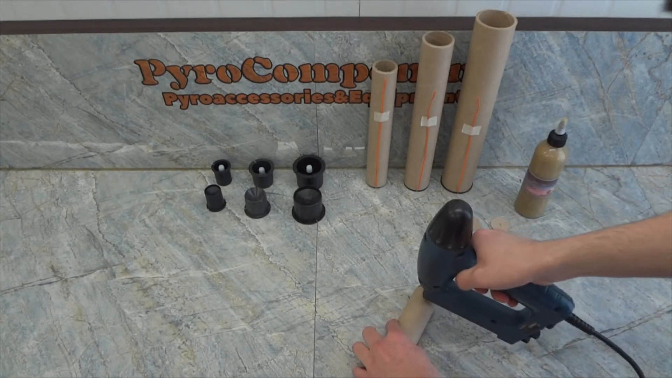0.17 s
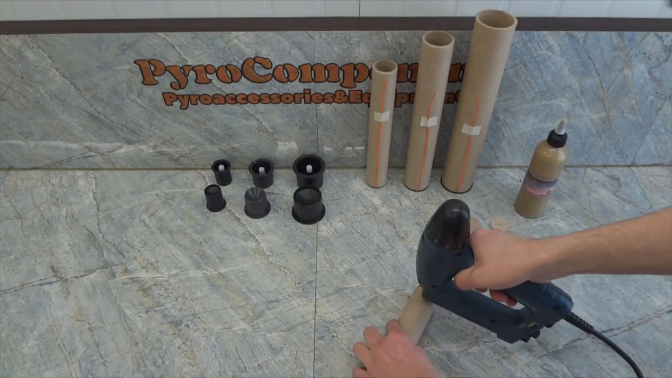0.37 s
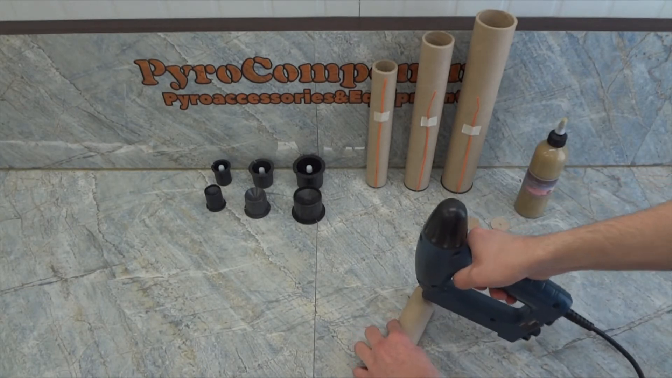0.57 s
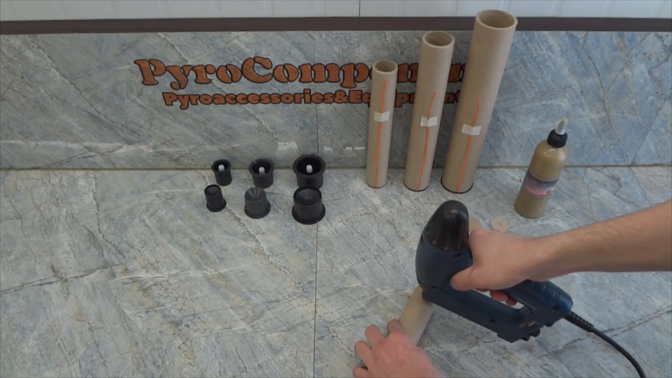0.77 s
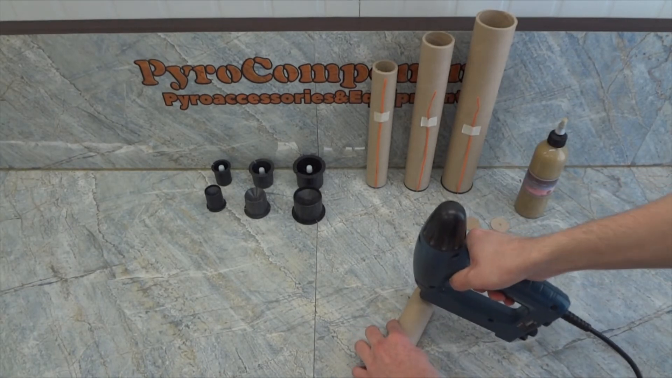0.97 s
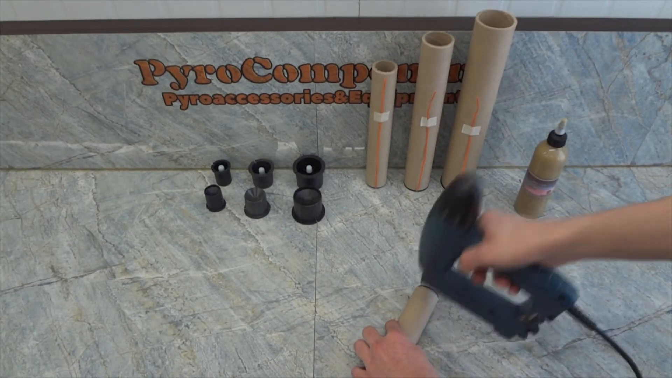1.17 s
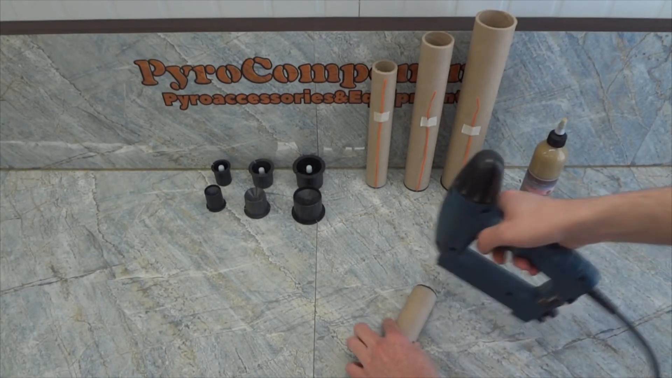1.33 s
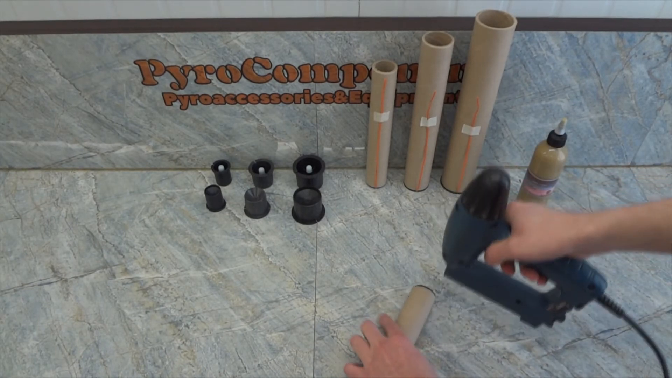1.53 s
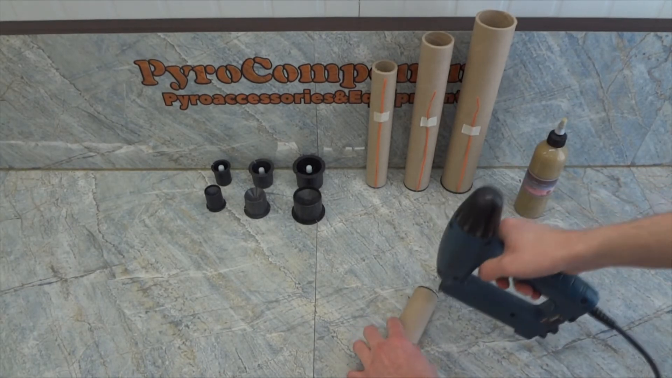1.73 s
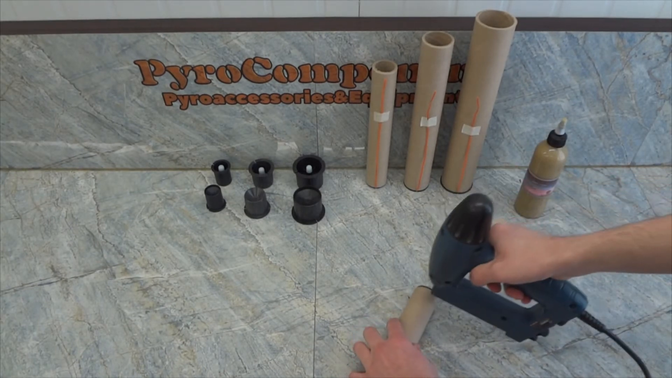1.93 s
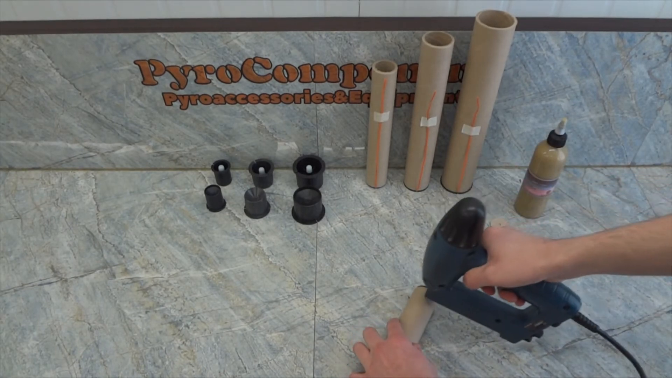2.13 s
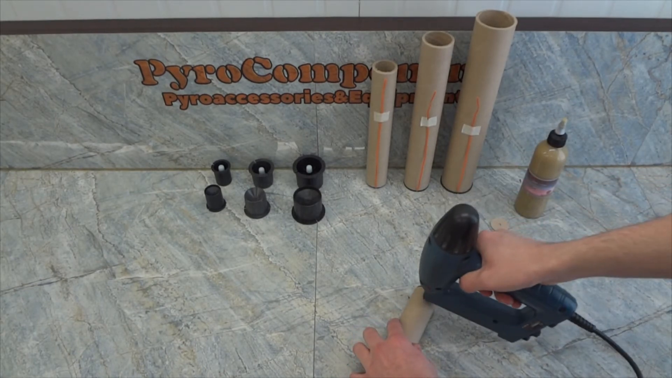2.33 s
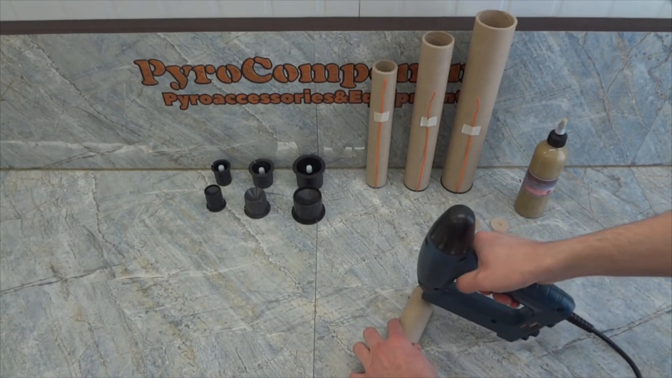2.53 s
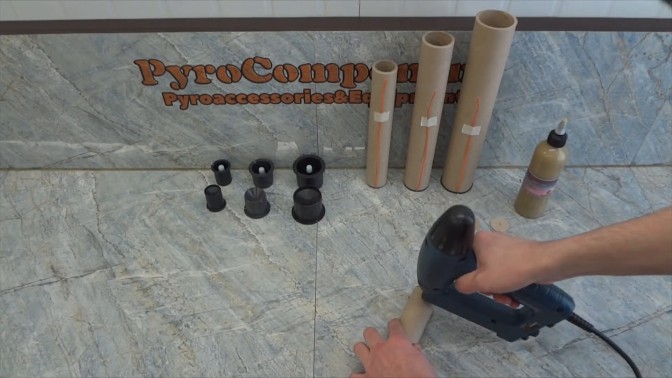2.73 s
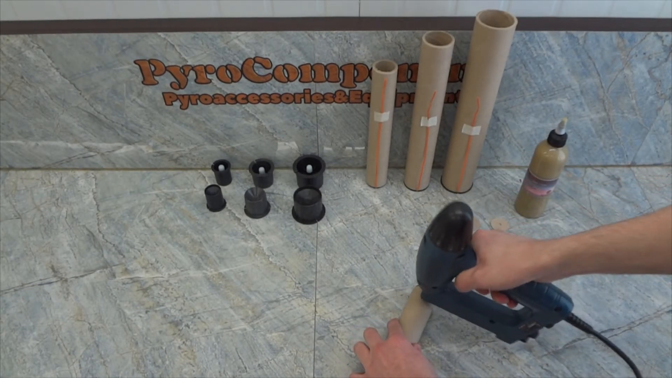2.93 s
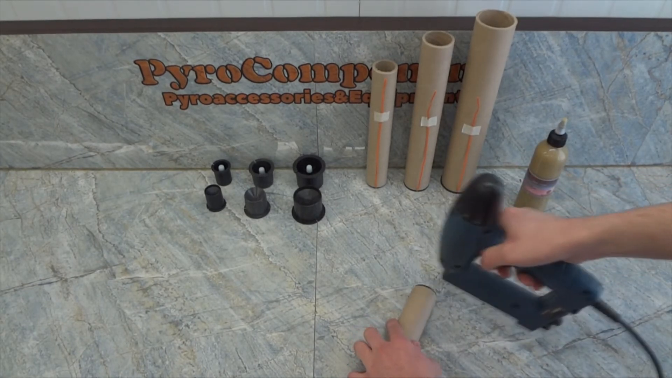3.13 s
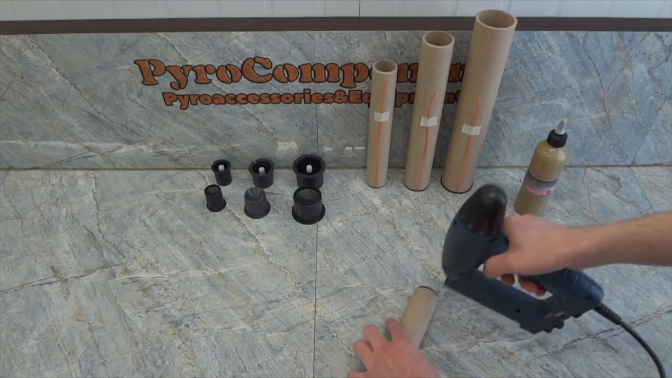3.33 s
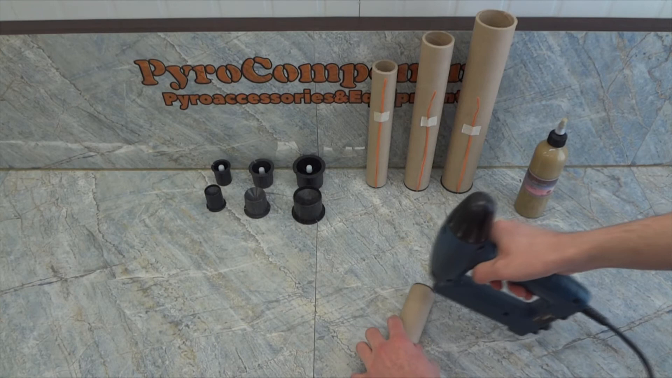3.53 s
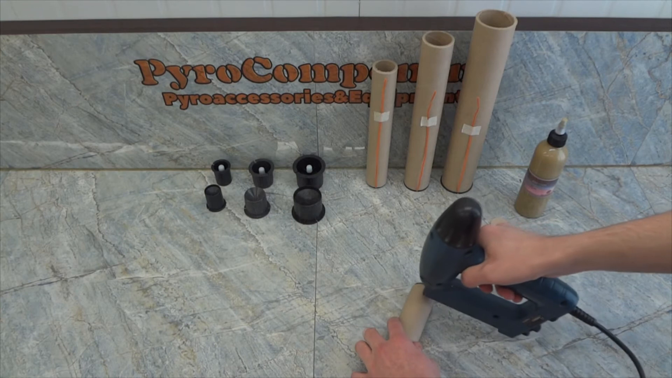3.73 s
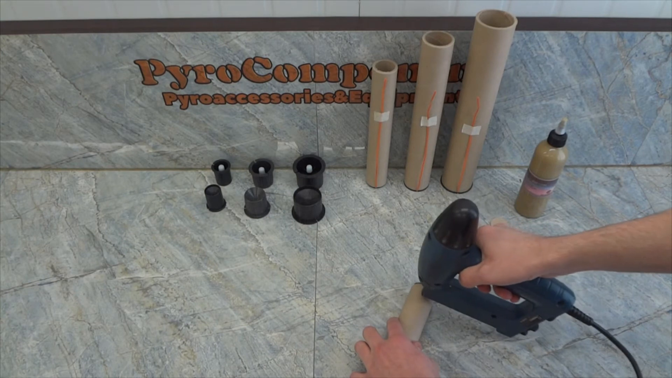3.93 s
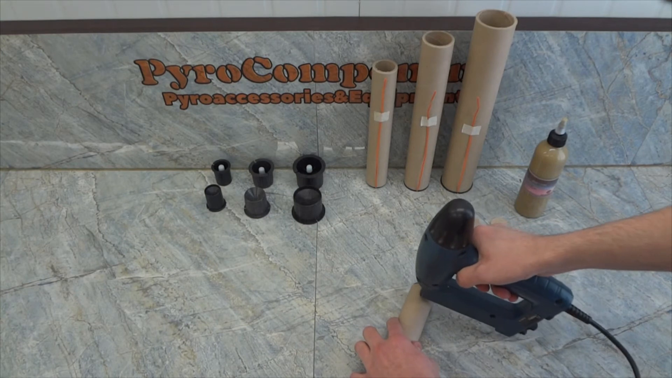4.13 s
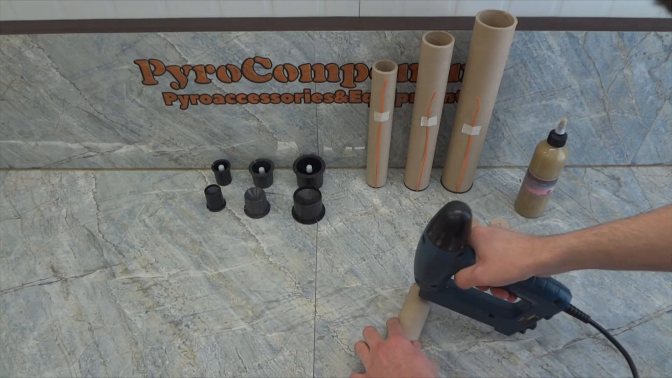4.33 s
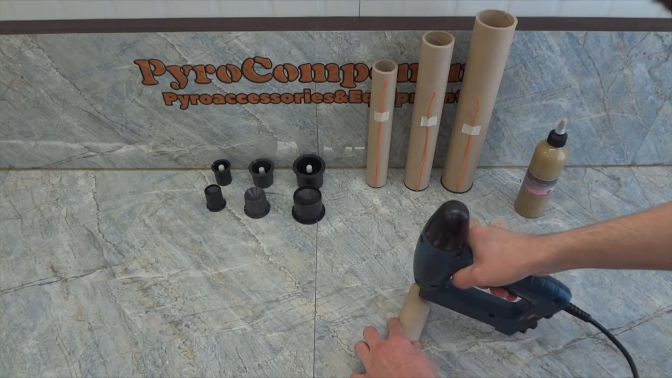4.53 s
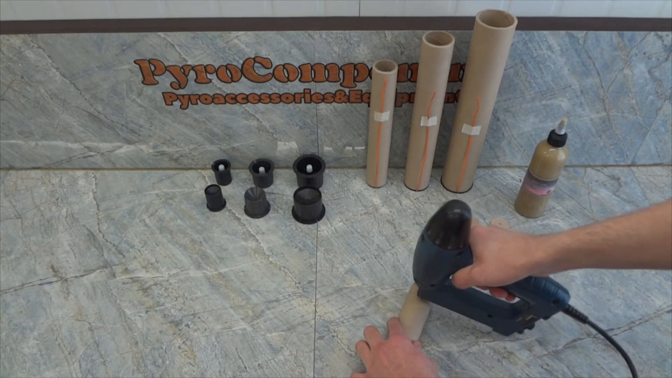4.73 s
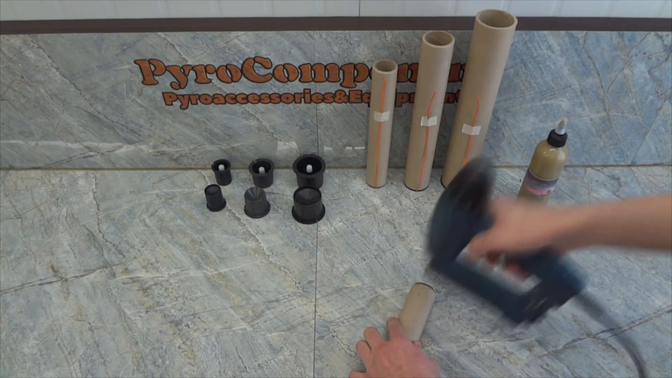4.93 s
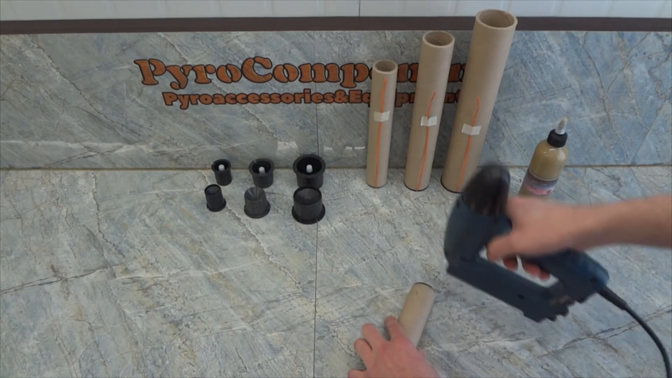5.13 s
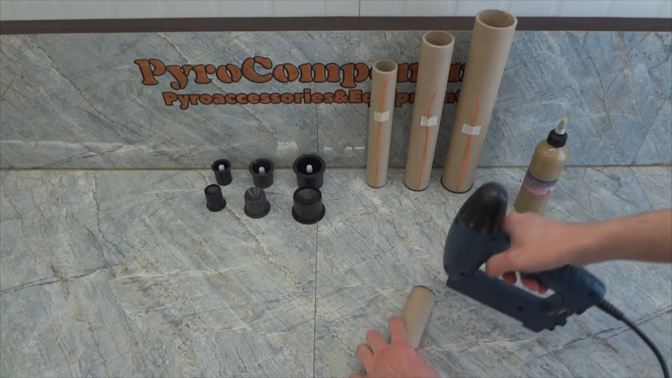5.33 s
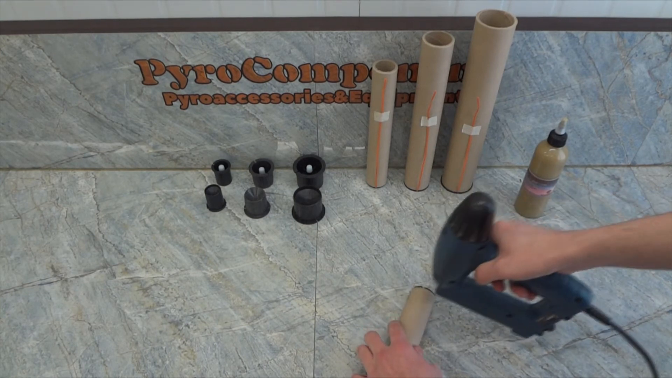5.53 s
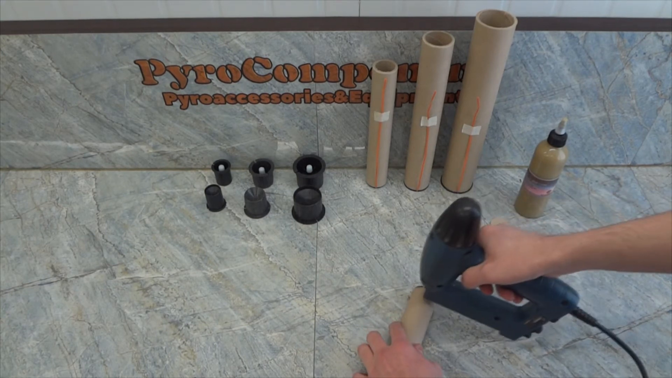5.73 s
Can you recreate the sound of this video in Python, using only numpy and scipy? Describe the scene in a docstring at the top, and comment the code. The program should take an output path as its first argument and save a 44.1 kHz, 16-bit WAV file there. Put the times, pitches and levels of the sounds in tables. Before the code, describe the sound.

A hand rustles softly on a cardboard tube lying on a tiled floor, with light knocks, taps and small plastic clicks. At about 0.9 seconds a trigger clicks and an electric staple gun fires: a loud, sharp bang, followed at once by a smaller thump and clack as the mechanism resets. A faint metallic spring tone lingers. From about 1.9 to 2.4 seconds the gun's nose taps the rim and the tube shifts with a quiet rustle. The second bang comes at 2.8 seconds. A hollow knock follows at 3.7 seconds, then more light taps just after 4 seconds. The third bang lands at 4.7 seconds, followed by a grip click and a soft knock around 5.3 seconds. Everything is close, in a small, hard room that rings briefly after each shot. The bangs sound slightly compressed, and a faint hiss runs underneath.

```python
"""Rustles, knocks and taps sound before and between three staple-gun bangs. A hand turns a cardboard
tube on the tiled floor of a small, hard room, and the electric gun's nose touches its rim. At each
shot the trigger clicks, a solenoid drives the plunger onto the staple, the gun recoils, and a
spring throws the plunger back. Each blow excites the room's modes and its reverberation.
The camera's limiter holds each bang flat until the ring has sunk below its ceiling."""
import sys
import numpy as np
from scipy import signal
from scipy.fft import rfft, irfft
from scipy.io import wavfile
from scipy.ndimage import uniform_filter1d

SR = 44100
rng = np.random.default_rng(int(sys.argv[2]) if len(sys.argv) > 2 else 0)


def log_audio(samples):
    """Write samples as a 16-bit WAV file to the path given in sys.argv[1]."""
    # one column per channel
    frames = np.atleast_2d(samples).T
    # limit to full scale, then quantise
    limited = np.clip(frames, -1, 1)
    pcm = np.round(limited * 32767).astype(np.int16)
    wavfile.write(sys.argv[1], SR, pcm)


N = 255339
TIME = np.arange(N) / SR
RING_TIME = TIME[:int(1.5 * SR)]  # time axis of one decaying event

# Levels are relative within each source, except those of the whine.
# reverberation time of the room: f/Hz, t60/s
REVERB_TIMES = [(60, 0.77), (140, 1), (230, 0.8), (400, 0.49), (1200, 0.36), (2500, 0.42), (5000, 0.38),
                (8000, 0.3), (15000, 0.2)]
# side-channel gain of the reverberation and of the hiss: f/Hz, level/dB
ROOM_SIDE = [(60, -38), (200, -28), (400, -21), (700, -14.5), (1300, -13.5), (4400, -12.5), (8000, -14),
             (15000, -18)]
HISS_SIDE = [(60, -14), (110, -15), (200, -4), (380, 4.5), (700, 5.5), (1290, 6), (2380, 5), (4400, -1),
             (8120, -6.5), (15000, -19)]
# spectrum of room air and microphone hiss: f/Hz, level/dB
HISS_SPECTRUM = [(15, -58), (25, -32), (107, -6), (156, -7.5), (183, -14), (267, -8.5), (378, -11.5),
                 (421, -5.5), (552, -11), (826, -9.5), (1240, -11), (1340, -11.5), (2060, -16),
                 (13900, -24.5), (15500, -26.5)]
# partials of the electronic whine: f/Hz, rms level/dB
WHINE_PARTIALS = [(6772, -87.5), (13485, -91), (13905, -79.5)]
# slides of the hand: t/s, level/dB, t60/s
HAND_SLIDES = [(0, -58, 0.57), (.54, -66.5, 1.6), (2.343, -66, 2.3), (4.33, -71.5, 2.1)]
# knocks of the tube: t/s, level/dB, contact cut-off f/Hz, floor thud level/dB
TUBE_KNOCKS = [(.002, -55.5, 900, -51.5), (.497, -55.5, 1235, -58), (0.668, -63.5, 607, -61.5),
               (2.353, -47, 757, -42), (3.7346, -22, 1385, -49), (5.307, -54.5, 655, -56.5)]
# taps of the nose on the rim: t/s, level/dB, plastic click level/dB, hop duration/s
NOSE_TAPS = [(0.3087, -26.5, -27.5, 0.025), (0.5485, -20, -31.5, 0.0082), (1.9018, -15.5, -44, 0),
             (2.2832, -10, -26, 0.017), (2.3538, -10, -25, 0.045), (3.7364, -11.5, -44, .018),
             (4.105, -14, -36, .0385), (4.2818, -13, -40, 0.054)]
# clicks of the grip and the trigger's release: t/s, level/dB, rattle t60/s
GRIP_CLICKS = [(.6795, -29, .077), (0.704, -28.5, .0044), (5.058, -17.5, .011)]
# shots: t/s, blow level/dB, thump delay/s, thump level/dB, plunger return level/dB,
# spring level/dB, trigger lead/s, trigger level/dB
STAPLE_SHOTS = [(0.8895, 29, 0.095, 9, 12, -52, .08, -20), (2.8304, 26.5, .1, 17, 11.5, -59, .088, -24.5),
                (4.691, 28, .125, 11.5, 9.5, -54.5, .048, -23)]
# modes of the tube, the loaded floor and the room: f/Hz, level/dB, t60/s
TUBE_MODES = [(268, -17, .35), (325, 0.5, 0.31), (346, -6.5, 0.48), (463, -3.5, 0.36), (547, -3.5, 0.42),
              (635, -7.5, 0.33), (732, -3.5, 0.33), (871, -4.5, 0.35), (1033, -14.5, .26),
              (1058, -7.5, 0.33), (1170, -21, 0.234)]
FLOOR_MODES = [(60, -16.5, .4), (125, -10.5, 0.32), (242, -11, .25), (374.2, -1.5, 0.25), (510, -1, 0.22),
               (590, -10.5, 0.37), (660, -2.5, .2), (882, -14, 0.27)]
ROOM_MODES = [(54, -34, 0.93), (112, -32.5, 1.4), (121.4, -14, .8), (151.9, -23, 1.2), (260, -13, 0.82),
              (331.5, -3.5, 0.56), (450.8, -3, 0.7), (630, 7, 0.48), (704, 6, 0.55), (772, 3.5, 0.18),
              (925, 4.5, 0.52)]
# modes of the return spring: frequency ratio, level/dB, t60/s
SPRING_MODES = [(.84, -15, 2.5), (1, -3, 3.1), (1.32, -13, 1.2), (1.493, 8, 1.0)]
# pitch of the spring at each shot: f/Hz
SPRING_PITCHES = [1312, 1312, 1395]
# spectra of the contacts: f/Hz, level/dB
SKIN_SPECTRUM = [(30, -3), (130, 1), (400, -2), (1000, -2), (2200, 1.5), (6000, -9.5), (12000, -4.5),
                 (16000, -22)]  # skin on cardboard
TAP_SPECTRUM = [(150, -46), (430, -27), (630, 3.5), (950, -8), (1500, 2), (2000, 1.5), (2700, -12),
                (4200, -17), (5500, -26), (7500, -22.5), (14000, -30.5)]  # nose on the rim
CLICK_SPECTRUM = [(200, -34), (1000, -11.5), (1700, -1.5), (2600, 3.5), (5200, 4.5), (8000, -1),
                  (11500, 0.5), (16000, -12.5)]  # plastic parts
CRACK_SPECTRUM = [(100, -31.5), (400, -13), (700, -2.5), (1200, -2), (2000, -12), (3500, -4), (6000, 0.5),
                  (8500, -2), (11000, 0.5), (13500, -1.5), (16000, -8)]  # staple going in
BODY_SPECTRUM = [(30, -41.5), (60, -28.5), (95, -35), (125, -21), (205, -33.5), (280, -10.5), (480, -0.5),
                 (690, 1.5), (950, 0), (1130, -9), (1400, 2), (1650, -2.5), (2000, 3.5), (5000, -7.5),
                 (9000, -14), (16000, -16)]  # housing and tube under a blow
THUMP_SPECTRUM = [(40, -30), (95, -28), (130, -15.5), (200, -25), (420, -9), (700, 7), (950, 0),
                  (1200, -11), (2100, -3.5), (5000, -8.5), (12000, -26.5)]  # recoiling gun dropping back on the tube
CLACK_SPECTRUM = [(60, -27.5), (200, -28), (300, -5), (650, 1), (1000, -6), (1400, 2.5), (1680, -10.5),
                  (2000, 6), (2900, 2), (5000, -3), (8000, -10.5), (15000, -33)]  # plunger on its stop
HOLLOW_SPECTRUM = [(30, -30.5), (110, -25.5), (200, -22.5), (310, 2.0), (850, 4), (1130, 0),
                   (1600, -29.5), (5000, -47.0)]  # rocking tube


def undb(db):
    """Amplitude ratio of a level in decibels."""
    return 10 ** (np.asarray(db) / 20)


def unit(x):
    """Normalisation to rms 1."""
    return x / np.sqrt(np.mean(x ** 2))


def fade(t60):
    """Exponential damping: 60 dB are lost in t60 seconds."""
    return np.exp(-np.log(1000) * RING_TIME / t60)


def rise(tau_s):
    """First-order build-up with time constant tau_s."""
    return 1 - np.exp(-RING_TIME / tau_s)


def add(track, s, sound):
    """Superposition of a sound on a track from time s on."""
    start = max(int(s * SR), 0)
    track[start:start + len(sound)] += sound[:N - start]


def colour(x, spectrum):
    """Minimum-phase filtering: folding the cepstrum of the log gain makes the response causal."""
    size = 8192
    hz, db = np.transpose(spectrum)
    grid_hz = np.maximum(np.arange(size // 2 + 1) * SR / size, 1)
    gain = undb(np.interp(np.log(grid_hz), np.log(hz), db))
    cepstrum = irfft(np.log(gain))
    cepstrum[1:size // 2] *= 2
    cepstrum[size // 2 + 1:] = 0
    response = irfft(np.exp(rfft(cepstrum)))[:size // 2]
    return signal.fftconvolve(x, response)[:len(x)]


def stereo(mid, side, side_spectrum):
    """Mid-side stereophony: two close microphones agree in the bass and differ more higher up."""
    return mid + np.array([[1], [-1]]) * colour(side, side_spectrum)


def ring(modes, pitch=1):
    """Free vibration: a sum of damped modes, each with its own phase."""
    return sum(undb(db) * fade(t60) * np.sin(2 * np.pi * (hz * pitch * RING_TIME + rng.random()))
               for hz, db, t60 in modes)


def chatter(t60, attack_s=0):
    """Broadband excitation by loose parts: whitened noise of unit energy and nominal decay t60."""
    burst = rng.standard_normal(len(RING_TIME)) * fade(t60)
    whitened = irfft(np.exp(1j * np.angle(rfft(burst))), len(RING_TIME))
    attack = np.minimum((RING_TIME + 1 / SR) / max(attack_s, 1 / SR), 1)
    rattle = whitened * np.sqrt(fade(2 * t60)) * attack
    return rattle / np.linalg.norm(rattle)


def impact(rattle_db, t60):
    """Impulsive excitation: one sharp contact and its rattle, of unit energy."""
    hit = signal.unit_impulse(len(RING_TIME)) + undb(rattle_db) * chatter(t60)
    return hit / np.linalg.norm(hit)


def diffuse_field(build_s):
    """Reverberation: reflections between tiles gather quickly, and the bass decays slowest."""
    noise = rfft(rng.standard_normal(len(RING_TIME)))
    log_hz = np.log(np.maximum(np.arange(len(noise)) * SR / len(RING_TIME), 1))
    band_hz, band_t60 = np.transpose(REVERB_TIMES)
    bands = [np.interp(log_hz, np.log(band_hz), share) for share in np.eye(len(band_hz))]
    tail = sum(irfft(noise * band, len(RING_TIME)) * fade(t60) for band, t60 in zip(bands, band_t60))
    return tail * rise(build_s) / np.sqrt(SR)


def in_room(x, room, wet_db):
    """Convolution with the room's impulse response, added to the direct sound."""
    return x + undb(wet_db) * signal.fftconvolve(x[None], room, axes=1)[:, :N]


def background(hiss_db=-66.5):
    """Noise floor: steady room air and microphone hiss, with the pure tones of an electronic whine."""
    mid, side = (unit(colour(rng.standard_normal(N), HISS_SPECTRUM)) for _ in range(2))
    whine = sum(np.sqrt(2) * undb(db) * np.sin(2 * np.pi * hz * TIME) for hz, db in WHINE_PARTIALS)
    return undb(hiss_db) * stereo(mid, side, HISS_SIDE) + whine


def sliding_hand(room, hold_db=-83.5, grain_db=3, creaks_per_s=24, creak_db=25, scatter_db=3):
    """Friction: skin catches on cardboard fibres and the grip creaks, in proportion to sliding speed."""
    speed = np.full(N, undb(hold_db))  # even a holding hand rustles
    for s, db, t60 in HAND_SLIDES:
        add(speed, s, undb(db) * fade(t60) * rise(0.005))
    fibres = rng.standard_normal(N) * undb(grain_db * rng.exponential(size=N))
    rustle = speed * unit(colour(fibres, SKIN_SPECTRUM))
    onsets = rng.random(N) < creaks_per_s / SR
    ticks = onsets * undb(creak_db + scatter_db * rng.standard_normal(N))
    creaks = signal.fftconvolve(ticks, chatter(t60=0.012))[:N]
    return in_room(rustle, room, wet_db=15.5) + speed * colour(creaks, CLICK_SPECTRUM)


def tube_knocks(room, rock_db=27, ring_db=-2, rock_back_s=0.042, rock_back_db=-11.5):
    """Soft contact acts as a low-pass: the tube's low modes ring, it rocks back, the floor thuds."""
    tones, rocking = np.zeros((2, N))
    for s, db, cutoff_hz, thud_db in TUBE_KNOCKS:
        contact = signal.butter(2, cutoff_hz, fs=SR, output="sos")
        add(tones, s, undb(thud_db) * ring(FLOOR_MODES) * rise(0.00017))
        for at, bump_db in (s, db), (s + rock_back_s, db + rock_back_db):
            tube = ring(TUBE_MODES) * rise(0.019)
            add(tones, at, undb(bump_db + ring_db) * signal.sosfilt(contact, tube))
            add(rocking, at, undb(bump_db + rock_db) * signal.sosfilt(contact, chatter(t60=0.058)))
    return tones + in_room(colour(rocking, HOLLOW_SPECTRUM), room, wet_db=25.5)


def nose_and_grip(room, full_hop_s=0.12):
    """Impact and rebound: the nose taps the rim, shorter hops landing softer; the plastic grip clicks."""
    taps, clicks = np.zeros((2, N))
    for s, db, click_db, hop_s in NOSE_TAPS:
        for at, strength in (s, 1), (s + hop_s, hop_s / full_hop_s):
            add(taps, at, strength * undb(db) * impact(rattle_db=6, t60=0.025))
        add(clicks, s, undb(click_db) * chatter(t60=0.063, attack_s=0.0023))
    for s, db, t60 in GRIP_CLICKS:
        add(clicks, s, undb(db) * chatter(t60))
    rim = in_room(colour(taps, TAP_SPECTRUM), room, wet_db=17.5)
    return rim + in_room(colour(clicks, CLICK_SPECTRUM), room, wet_db=14.5)


def trigger(room, switch_db=1, switch_lead_s=0.021):
    """Contact noise: before each shot the trigger unlatches, scrapes along and closes the switch."""
    clicks = np.zeros(N)
    for s, *_, lead_s, db in STAPLE_SHOTS:
        add(clicks, s - lead_s, undb(db) * chatter(t60=0.051, attack_s=0.0027))  # latch
        add(clicks, s - lead_s, undb(db) * chatter(t60=0.75, attack_s=0.008))  # scrape
        add(clicks, s - switch_lead_s, undb(db + switch_db) * chatter(t60=0.067, attack_s=0.006))
    return in_room(colour(clicks, CLICK_SPECTRUM), room, wet_db=16)


def staple_gun(room, crack_db=2, pull_db=-31, boom_db=-17):
    """Momentum transfer: the plunger drives the staple, the gun recoils, the spring resets and rings."""
    pull_s, drive_s, return_s = 0.006, 0.0012, 0.168
    crack, body, thump, clack, tones = np.zeros((5, N))
    for shot, spring_hz in zip(STAPLE_SHOTS, SPRING_PITCHES):
        s, db, thump_s, thump_db, return_db, spring_db, *_ = shot
        # the solenoid snatches the plunger just ahead of the blow
        add(body, s - pull_s, undb(db + pull_db) * impact(rattle_db=15.5, t60=0.016))
        add(crack, s, undb(db + crack_db) * chatter(t60=0.075, attack_s=drive_s))
        add(body, s, undb(db) * chatter(t60=0.22, attack_s=drive_s))
        add(thump, s + thump_s, undb(thump_db) * chatter(t60=0.092))
        add(clack, s + return_s, undb(return_db) * chatter(t60=0.055))
        add(tones, s, undb(boom_db) * ring(ROOM_MODES) * rise(0.0087))
        add(tones, s, undb(spring_db) * ring(SPRING_MODES, spring_hz))
    blows = colour(crack, CRACK_SPECTRUM) + colour(body, BODY_SPECTRUM)
    rebounds = colour(thump, THUMP_SPECTRUM) + colour(clack, CLACK_SPECTRUM)
    return in_room(blows + rebounds, room, wet_db=27) + tones


def scene():
    """Superposition: gun, tube and hand are at one spot and so share one room response."""
    room = stereo(diffuse_field(build_s=0.0047), diffuse_field(build_s=0.003), ROOM_SIDE)
    contacts = staple_gun(room) + trigger(room) + tube_knocks(room) + nose_and_grip(room)
    return contacts + sliding_hand(room) + background()


def held(cut_db, db_per_s):
    """Peak detection: follows a rise at once and lets go at a steady rate."""
    recovery = db_per_s * TIME
    return np.maximum.accumulate(cut_db + recovery) - recovery


def limiter(x, ceiling_db, slow_share=0.13, treble_weight=2.275, window_s=0.0041):
    """Limiting: the whole sound ducks at once, most for bright bangs; it recovers fast, then slowly."""
    mid = x.mean(axis=0)
    power = mid ** 2 + (treble_weight * np.diff(mid, prepend=0)) ** 2
    mean_power = uniform_filter1d(power, int(window_s * SR))
    level_db = 10 * np.log10(np.maximum(mean_power, 1e-12))
    over_db = np.maximum(level_db - ceiling_db, 0)
    cut_db = np.maximum(held(over_db, db_per_s=260), held(slow_share * over_db, db_per_s=14))
    return x * undb(-cut_db)


def record(dry):
    """Limiting, saturation and low-pass: the camera holds the bangs, rounds peaks and cuts the top."""
    peak, top_hz = 0.9, 15800
    rounded = peak * np.tanh(limiter(dry, ceiling_db=-10) / peak)
    return signal.sosfilt(signal.ellip(10, 0.2, 80, top_hz, fs=SR, output="sos"), rounded)


dry = scene()
out = record(dry)
log_audio(out)
```